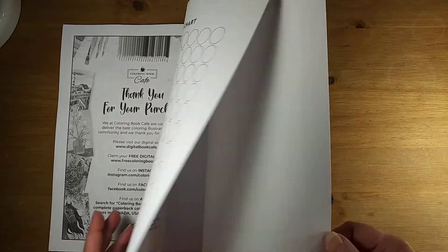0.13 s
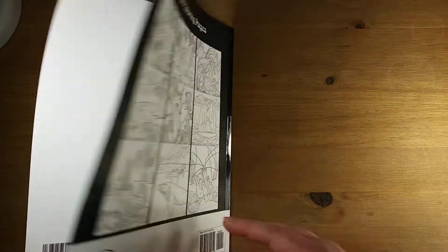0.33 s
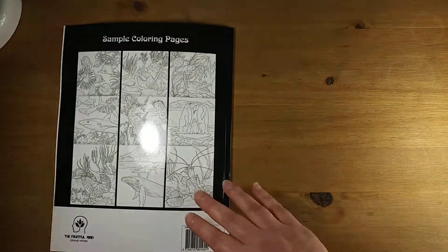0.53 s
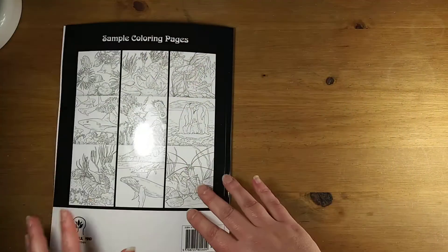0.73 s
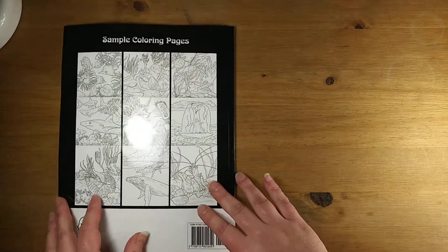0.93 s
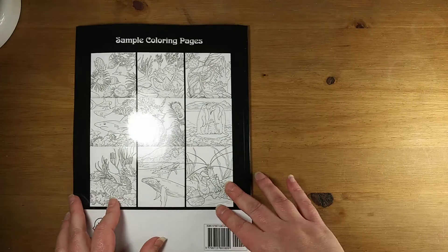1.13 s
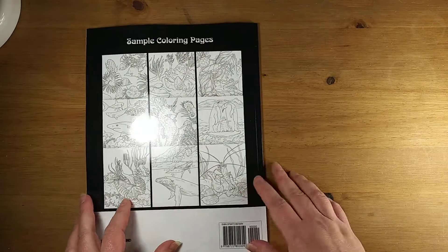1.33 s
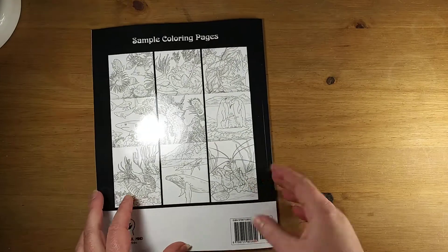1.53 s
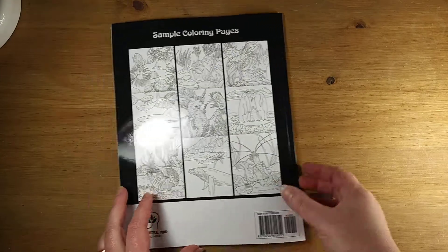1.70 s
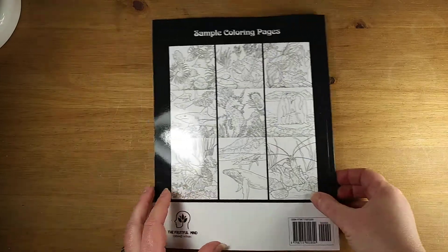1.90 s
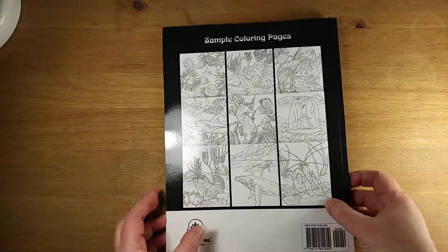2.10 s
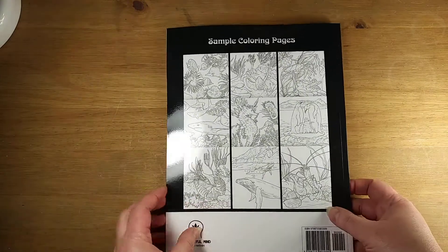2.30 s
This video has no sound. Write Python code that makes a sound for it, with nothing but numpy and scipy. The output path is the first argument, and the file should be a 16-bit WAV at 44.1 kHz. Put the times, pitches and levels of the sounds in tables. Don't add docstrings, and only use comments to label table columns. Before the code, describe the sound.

Book flopping closed with a papery crack and soft thump, followed by light handling on wood

```python
import sys
import numpy as np
from scipy import signal
from scipy.fft import rfft, irfft
from scipy.io import wavfile
from scipy.ndimage import uniform_filter1d

SR = 44100
rng = np.random.default_rng(int(sys.argv[2]) if len(sys.argv) > 2 else 0)


def natural_amplitude(level_db):
    exponent = np.asarray(level_db, float) / 20
    return 10 ** exponent


def transcribe(u):
    v = np.clip(np.atleast_2d(u).T, -1, 1)
    q = np.round(v * 32767).astype(np.int16)
    wavfile.write(sys.argv[1], SR, q)


N = 103635


def evened(x):
    return x / np.sqrt(np.mean(x ** 2) + 1e-20)


def coloured(x, points):
    f, db = np.transpose(points)
    hz = np.fft.rfftfreq(len(x), 1 / SR)
    gain = natural_amplitude(np.interp(np.log(hz + 1), np.log(f), db))
    return evened(irfft(rfft(x) * gain, len(x)))


def rings(x, body):
    total = 0
    for k, (hz, width, db) in enumerate(body):
        mode = signal.lfilter(*signal.iirpeak(hz, hz / max(width, 10), SR), x)
        total = total + (-1) ** k * natural_amplitude(db) * mode
    return evened(total)


def along(curve, column):
    return np.interp(np.arange(N) / SR, [r[0] for r in curve], [r[column] for r in curve])


def window(curve, edge_s=0.00079):
    t = np.arange(N) / SR
    to_end = np.minimum(t - curve[0][0], curve[-1][0] - t)
    return natural_amplitude(along(curve, 1)) * np.clip(to_end / edge_s + .5, 0, 1)


def grit(per_s, spread_db):
    draw = rng.random((N, 3))
    happens = draw[:, 0] < per_s / SR
    size = natural_amplitude(-spread_db * np.log(draw[:, 2] + 0.028))
    return happens * np.sign(draw[:, 1] - .5) * size


def add(mix, s, sound):
    part = mix[round(s * SR):][:len(sound)]
    part += sound[:len(part)]


# [f/Hz, level/dB per Hz]
HISS_COLOUR = [(25, -27), (90, -33), (200, -11), (400, -5), (4300, -17.5), (5500, -23.5), (10500, -22.5),
               (16000, -22.5)]
HISS_DB = -65
DIP_HZ, DIP_WIDTH_HZ, DIP_DB = 7900, 1000, -6
TICK_PER_S, TICK_DB, TICK_HZ, TICK_T60_S = 59.84, -58, 10060, 0.0022


def hiss():
    hz = np.fft.rfftfreq(N, 1 / SR)
    dip = natural_amplitude(DIP_DB * np.exp(-((hz - DIP_HZ) / DIP_WIDTH_HZ) ** 2))
    noise = coloured(rng.standard_normal(N), HISS_COLOUR)
    out = natural_amplitude(HISS_DB) * evened(irfft(rfft(noise) * dip, N))
    t = np.arange(200) / SR
    tone = np.sin(2 * np.pi * TICK_HZ * t)
    for s, size in zip(np.arange(0, N / SR, 1 / TICK_PER_S), rng.standard_normal(200)):
        add(out, s, natural_amplitude(TICK_DB + 3.2 * size - 60 * t / TICK_T60_S) * tone)
    return out


ROOM_DB, ROOM_T60_S = -16.5, 0.12


def room(x):
    taps = np.zeros(SR // 2)
    at = np.arange(200, SR // 2 - 20, 20)
    taps[at + rng.integers(0, 20, len(at))] = rng.choice([-1., 1.], len(at))
    hz, t, z = signal.stft(taps, SR, nperseg=256)
    decay = natural_amplitude(-60 * t / ROOM_T60_S * (0.5 + hz[:, None] / 5000))
    tail = signal.istft(z * decay, SR, nperseg=256)[1]
    return signal.fftconvolve(x, tail / np.linalg.norm(tail))[:N]


# [t/s, peak level/dB, f/Hz, t60/s]
BUMPS = [
    (.167, -43, 900, .05),
    (.241, -44, 290, .07),
    (.278, -34, 290, .05),
    (.267, -45, 400, .03),
    (1.283, -56, 450, .05),
    (1.315, -49, 270, .04),
    (1.664, -53, 225, .07),
    (2.085, -55, 200, .1),
    (2.316, -53, 290, .05),
]


def knocks():
    out, t = np.zeros(N), np.arange(5000) / SR
    chance = rng.standard_normal((len(BUMPS), 5000))
    for (s, db, hz, t60), noise in zip(BUMPS, chance):
        upper = .5 * np.sin(2 * np.pi * hz * 1.38 * t) * natural_amplitude(-40 * t / t60)
        ring = np.sin(2 * np.pi * hz * t) + upper
        puff = evened(signal.lfilter(*signal.butter(2, hz * 3, fs=SR), noise))
        body = ring + .8 * puff * natural_amplitude(-60 * t / t60)
        add(out, s, natural_amplitude(db - 60 * t / t60) * body * np.clip(t / .003, 0, 1))
    return out


# [t/s, peak level/dB, f/Hz, sharp edge level/dB, tail level/dB]
RELEASES = [(.0633, -50, 2500, -3, -12), (.1645, -46, 900, -6, -6), (.1672, -35, 950, -1, -10),
            (.168, -43, 6000, -6, -14), (.2058, -54, 1500, -10, -12), (.279, -25, 1050, -40, -22),
            (.2806, -31, 1700, -40, -20), (.2812, -39, 2700, -40, -24), (.2935, -30, 750, -50, -24),
            (.3064, -22.5, 520, -50, -24), (.3385, -30, 650, -50, -24), (.3405, -33, 1000, -50, -26),
            (.769, -48, 3000, 3, -12), (.9448, -38, 2600, 7, -9), (1.3148, -44, 800, -12, -7),
            (1.4975, -53, 900, -12, -6), (1.5425, -47, 680, -14, -11), (1.6606, -35.5, 3200, -20, -14),
            (1.6915, -45, 1200, -20, -10), (1.7475, -43, 1100, -8, -10), (1.7815, -44, 1100, -10, -10),
            (1.7007, -42, 4400, -20, -12), (1.8826, -38, 900, 5, -9), (1.884, -43, 4500, -4, -16),
            (1.8955, -45, 1000, -8, -10), (2.31538, -26.5, 3300, -4, -19), (2.3168, -43, 1000, -40, -14),
            (2.3252, -48, 1200, -10, -14)]
# [f/Hz, level/dB per Hz]
CRISP_COLOUR = [(200, -14.5), (1100, -11), (2000, -7), (3500, -4), (5000, -4.5), (5800, -14),
                (12000, -14.5), (16000, -49)]
SNAP_CYCLES, SNAP_T60_S = 1.1, .042


def snaps():
    out, t = np.zeros(N), np.arange(3000) / SR
    crisp = coloured(rng.standard_normal(N), CRISP_COLOUR)
    for s, db, hz, edge_db, tail_db in RELEASES:
        onset = np.sin(np.pi / 2 * np.minimum(3 * t * hz, 1)) ** 2
        ring = 1.6 * np.sin(2 * np.pi * hz * t) * onset * np.exp(-(t * hz / SNAP_CYCLES) ** 2)
        edge = natural_amplitude(edge_db) * np.cos(2 * np.pi * 7000 * t) * np.exp(-t * SR / 1.5)
        dull = signal.butter(2, min(hz * hz / 450, 18000), fs=SR)
        colour = signal.lfilter(*dull, crisp[round(s * SR) - 2000:][:3000])
        tail = natural_amplitude(tail_db - 60 * t / SNAP_T60_S) * np.clip(t / 0.00025, 0, 1) * evened(colour)
        add(out, s, natural_amplitude(db) * (ring + edge + tail))
    return signal.lfilter(*signal.butter(1, [250, 13000], "band", fs=SR), out)


# [t/s, level/dB, table thrum from weight/dB, fizz from speed/dB]
PAGE_STROKE = [(0, -59.5, -13, 4), (.022, -61, -2.5, 8), (.05, -69, -23, 4), (.062, -68, -5, 14),
               (.088, -66.5, -6, 1), (0.107, -60.5, -3.5, 7.5), (.14, -65.5, -6, 7), (.158, -65.5, -2.5, 8),
               (.172, -62.5, 0, 11), (0.227, -90, 12, -13)]
AIRING_STROKE = [(0.249, -54, 6.5, -7), (.3, -63.5, 9, -8), (.39, -72, 7, 2), (.43, -65, -9, -2),
                 (.47, -70, -7, 1), (.5, -78, -8, 0)]
SETTLE_STROKE = [(0.501, -67, 8, 7), (0.504, -50, -1.5, -14), (0.52, -61.5, 7, 1), (0.529, -63, 1, -10),
                 (0.551, -59.5, -30, -13), (.585, -80, -13, -16)]
FINGER_STROKE = [(.86, -83, -23, -8), (0.931, -68.5, 4.5, 7.5), (1., -71.5, -59, 4), (1.179, -65.5, -2, 5),
                 (1.23, -73, -60, 3), (1.285, -66.5, 6, -3), (1.31, -66, -7, 0), (1.322, -63.5, 1, 0),
                 (1.346, -76, 2, -4)]
NUDGE_STROKE = [(1.355, -69, 3, -8), (1.365, -60, 8, -15), (1.377, -53.5, 3, -6), (1.408, -52, -3.5, 7),
                (1.427, -60.5, -2.5, -5), (1.487, -70, 5, 1), (1.609, -64, -13, -1)]
SLIDE_STROKE = [(1.599, -68, -35, 0), (1.64, -58, -12, 0), (1.657, -55, -8, 0), (1.665, -56, -5, 0),
                (1.685, -54, -6, 0), (1.7, -54, -12, 0), (1.722, -55.5, 0, 0), (1.757, -52, -4, 0),
                (1.8, -57.5, -4, 0.0098), (1.839, -61, -25, 0)]
SHOVE_STROKE = [(1.839, -60, -12, 3), (1.864, -50.5, 0, -2.5), (1.877, -56.5, -4, -1),
                (1.894, -56.5, -1.5, 2.5), (1.949, -64, 0.5, -6), (2.03, -63, -7.5, -15),
                (2.15, -67.5, 0.5, -10), (2.3, -80, 2, -14), (2.35, -78, -1, -7)]
# [table f/Hz, width/Hz, level/dB, cover f/Hz, level/dB]
STROKE_BODIES = [
    (950, 61, 0, 4040, -8),
    (900, 140, -10, 3500, -24),
    (750, 84, 2.5, 2100, -18),
    (800, 51, -7, 2800, -19),
    (872, 31, 8, 3600, -19.5),
    (1037, 105, 7, 4400, -17),
    (940, 260, -1, 4500, -19),
]
# [f/Hz, width/Hz, level/dB]
TABLE_MODES = [(227, 160, -7), (330, 120, -1.5), (630, 270, -8.5), (1480, 170, -21)]
# [f/Hz, level/dB per Hz]
SHEEN_COLOUR = [(300, -8), (1000, -1), (1600, 2.5), (3000, 3.5), (4700, -2), (5500, -20), (9000, -17.5)]
# [f/Hz, level/dB per Hz]
FIZZ_COLOUR = [(3000, -37), (5200, 7), (7000, 4.5), (8200, -8.5), (11000, -5), (16000, -24)]
FIZZ_DB = -10.5
GRIT_PER_S, GRIT_SPREAD_DB, CLUMP_DB = 9000, 2.5, 2.
COVER_WIDTH_HZ, COVER_WANDER_DB = 250, 4


def rubbing():
    clumps = evened(uniform_filter1d(uniform_filter1d(rng.standard_normal(N), 300), 300))
    slips = evened(grit(GRIT_PER_S, GRIT_SPREAD_DB) * natural_amplitude(CLUMP_DB * clumps))
    wander = evened(uniform_filter1d(clumps[::-1], size=1500))
    sheen = coloured(slips, SHEEN_COLOUR)
    fizz = coloured(slips, FIZZ_COLOUR)
    strokes = (PAGE_STROKE, AIRING_STROKE, SETTLE_STROKE, FINGER_STROKE,
               NUDGE_STROKE, SLIDE_STROKE, SHOVE_STROKE)
    out = np.zeros(N)
    for stroke, (low_hz, width, low_db, hz, db) in zip(strokes, STROKE_BODIES):
        cover = natural_amplitude(db + COVER_WANDER_DB * wander) * rings(slips, [(hz, COVER_WIDTH_HZ, 0)])
        thrum = natural_amplitude(along(stroke, 2)) * rings(slips, TABLE_MODES + [(low_hz, width, low_db)])
        speed = natural_amplitude(FIZZ_DB + along(stroke, 3))
        out += window(stroke) * (sheen + cover + thrum + speed * fizz)
    return out


# [t/s, level/dB, top edge f/Hz]
FLOP_AIR = [(.2745, -51, 600), (.2785, -37.5, 600), (.282, -36, 900), (.287, -30.5, 690),
            (.296, -34.5, 800), (.303, -33, 1480), (.309, -30.5, 1490), (.316, -32.5, 1400),
            (.324, -36.5, 900), (.34, -32, 800), (.36, -47.5, 750), (.392, -63, 600)]
# [t/s, level/dB, top edge f/Hz]
BOUNCE_AIR = [(.392, -69, 600), (0.403, -49.5, 680), (0.428, -42, 750), (0.448, -45, 657),
              (.47, -62.5, 564), (0.501, -66, 500)]
# [f/Hz, width/Hz, level/dB]
FLOP_COVER = [(167, 67, -14.5), (247.6, 36, -2.5), (361, 42, 1.5), (435, 53, -1), (650, 150, -3.5),
              (935, 48, 5.5), (1190, 150, -4.5), (1570, 200, 0), (2170, 680, -5.5)]
# [f/Hz, width/Hz, level/dB]
FLAT_COVER = [(177, 72, -12.5), (251, 36, -5.5), (373, 45, 1), (550, 130, -3), (733, 76, -1.5),
              (846, 55, -0.5), (1020, 60, -4), (1440, 240, -4)]
FLUTTER_PER_S = 700


def flop():
    flutter = evened(grit(FLUTTER_PER_S, 3.8)) + 0.29 * rng.standard_normal(N)
    out = np.zeros(N)
    for curve, cover in ((FLOP_AIR, FLOP_COVER), (BOUNCE_AIR, FLAT_COVER)):
        hz, t, z = signal.stft(rings(flutter, cover), SR, nperseg=256, noverlap=224)
        edge_hz = np.interp(t, [r[0] for r in curve], [r[2] for r in curve])
        gap = 1 / (1 + (hz[:, None] / edge_hz) ** 3.5)
        dull = signal.istft(z * gap, SR, nperseg=256, noverlap=224)[1][:N]
        out += window(curve) * dull / np.sqrt(uniform_filter1d(dull ** 2, size=500) + 1e-9)
    return out


# [f/Hz, level/dB per Hz]
RIP_COLOUR = [(150, -23), (290, -9), (560, 0), (900, -26), (1500, -7), (2300, -8.5), (4800, -3),
              (5700, -29)]
# [f/Hz, width/Hz, level/dB]
RIP_MODES = [(3700, 130, -4), (4630, 140, -1.5), (1430, 120, -3.5)]
# [f/Hz, level/dB per Hz]
SPIT_COLOUR = [(5000, -26), (6400, 7), (8000, -11), (10400, -1), (12000, -18), (14500, -21), (16000, -27)]
RIP_S, RIP_DB, RISE_S, HOLD_S, FALL_T60_S = .24, -36.5, 0.0047, 0.0054, 0.029
RATTLE_DB, RATTLE_T60_S = -6, 0.11
SPIT_DB, SPIT_HOLD_S, SPIT_T60_S, SPIT_RATTLE_DB = -11.5, 0.0037, 0.0086, -10


def rip():
    t = np.arange(N) / SR - RIP_S
    after = np.maximum(t - HOLD_S, 0)
    late = np.maximum(t - SPIT_HOLD_S, 0)
    rise = np.exp(np.minimum(t, 0) / RISE_S) * np.clip(0.46 + t / 0.0038, .35, 1)
    fall = natural_amplitude(-60 * after / FALL_T60_S) + natural_amplitude(RATTLE_DB - 60 * after / RATTLE_T60_S)
    spit = natural_amplitude(-60 * late / SPIT_T60_S) + natural_amplitude(SPIT_RATTLE_DB - 60 * late / RATTLE_T60_S)
    slips = grit(12000, 2.)
    body = evened(coloured(slips, RIP_COLOUR) + .7 * rings(slips, RIP_MODES))
    treble = natural_amplitude(SPIT_DB) * spit * coloured(slips, SPIT_COLOUR)
    return natural_amplitude(RIP_DB) * rise * (fall * body + treble)


def scene():
    book = rubbing() + flop() + rip() + snaps() + knocks()
    port = signal.butter(4, 150, "high", fs=SR, output="sos")
    heard = signal.sosfilt(port, book + natural_amplitude(ROOM_DB) * room(book))
    return (heard + hiss())[None]


def roll_off(x):
    return signal.sosfilt(signal.butter(12, 16460, fs=SR, output="sos"), x)


def record(dry):
    edge = signal.firwin(511, 15850, window=("kaiser", 9), fs=SR)
    mix = signal.oaconvolve(dry, edge[None], "same")
    return roll_off(mix)


dry = scene()
out = record(dry)
transcribe(out)
```